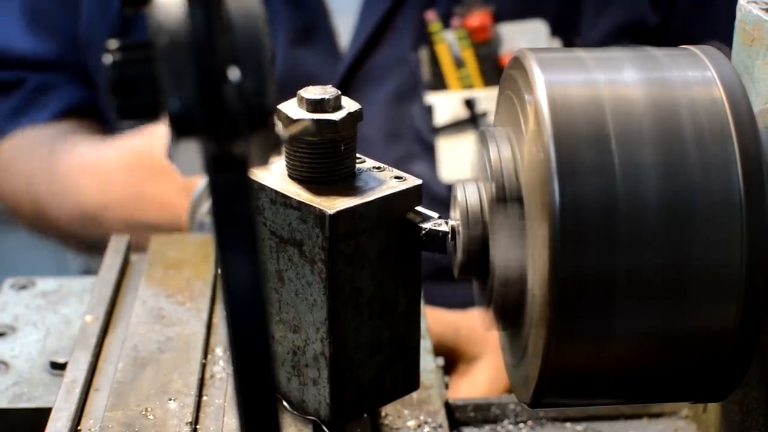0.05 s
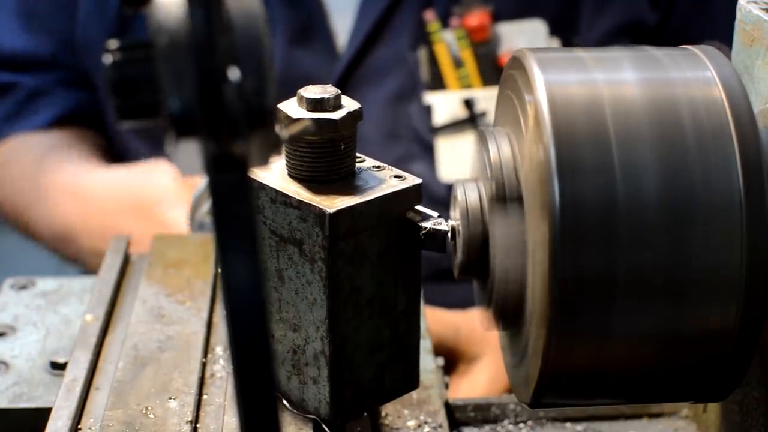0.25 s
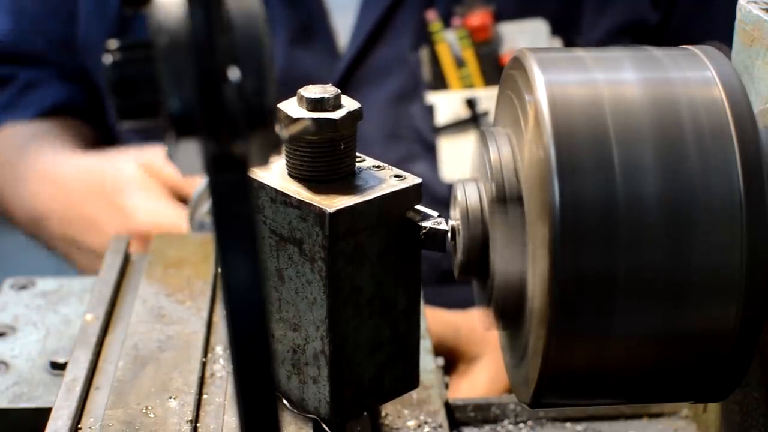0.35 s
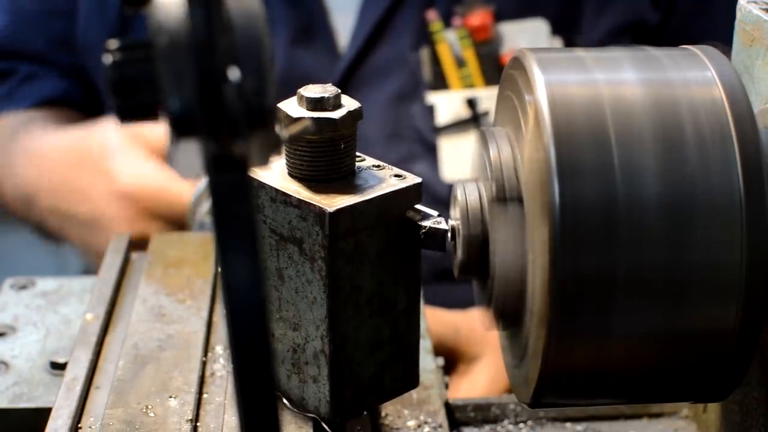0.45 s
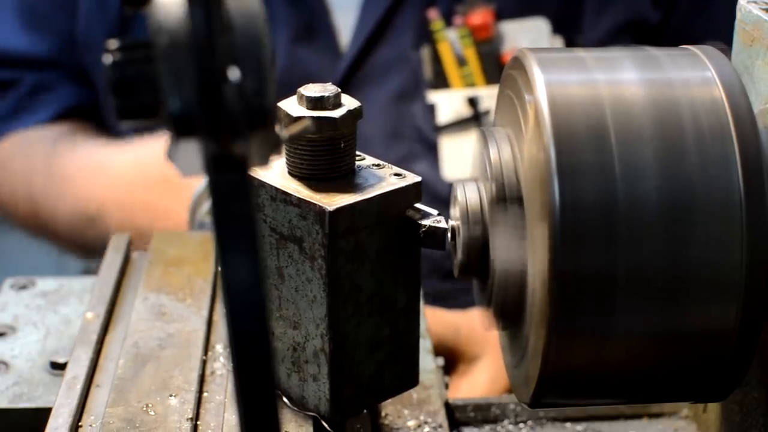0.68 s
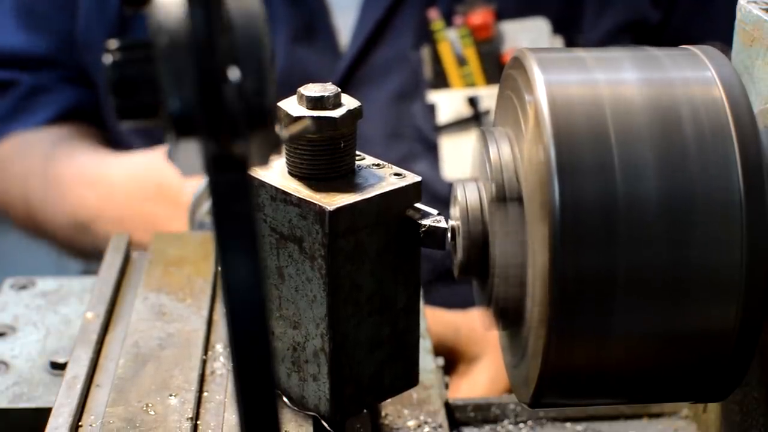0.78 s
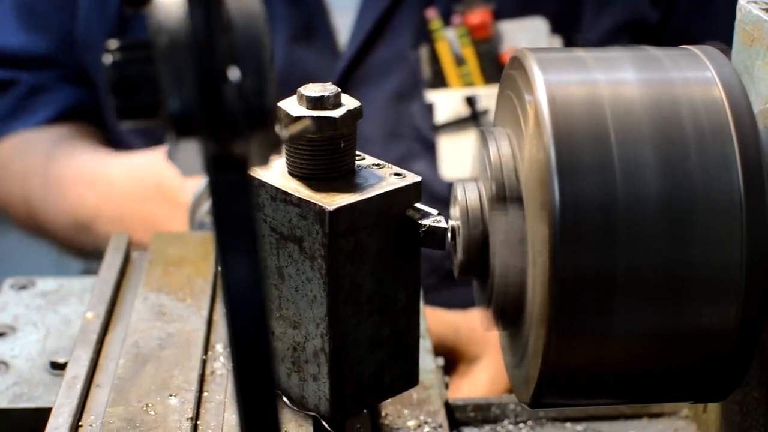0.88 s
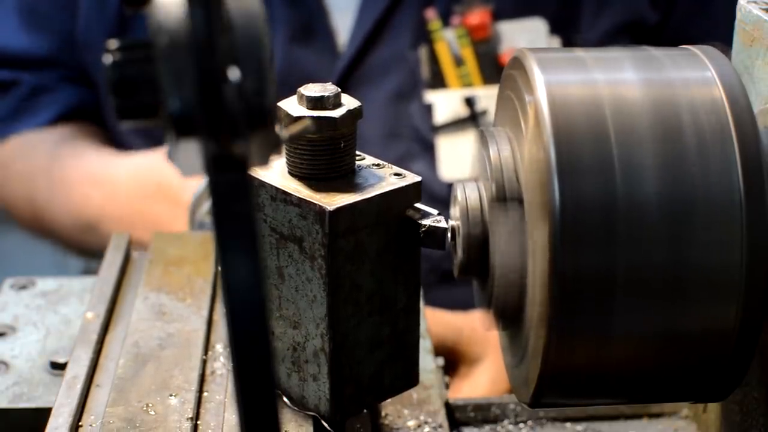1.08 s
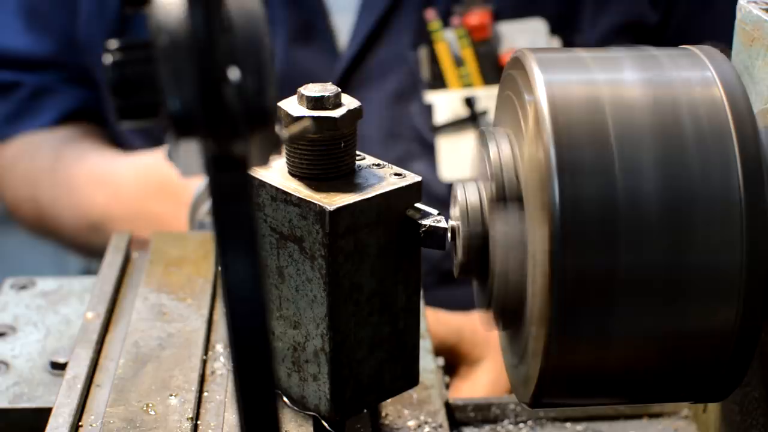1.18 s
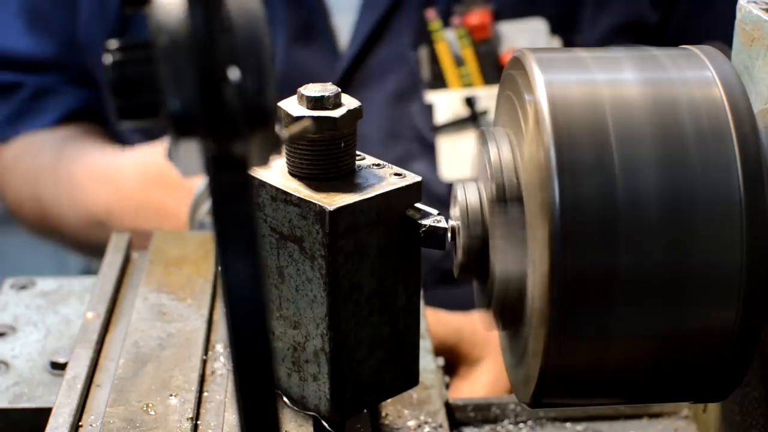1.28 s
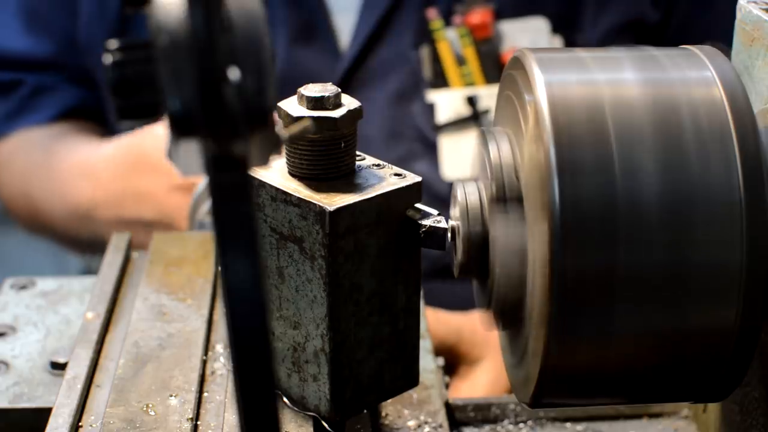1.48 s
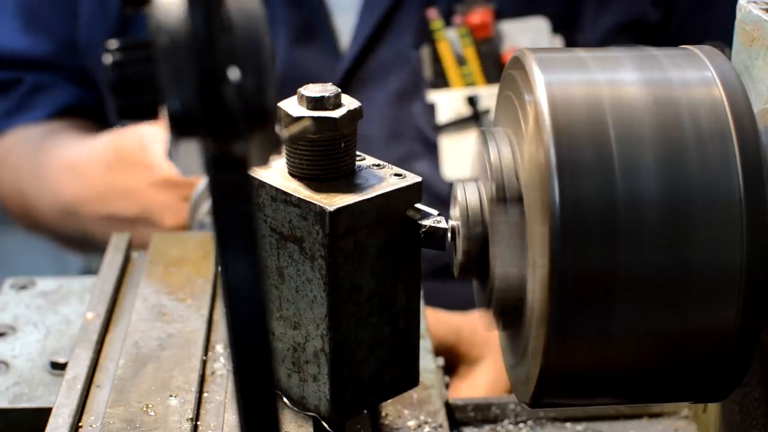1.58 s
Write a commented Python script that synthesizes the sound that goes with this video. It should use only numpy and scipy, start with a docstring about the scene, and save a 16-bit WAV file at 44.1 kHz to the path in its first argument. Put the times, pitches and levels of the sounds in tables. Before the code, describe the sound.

Close to the microphone, a lathe spins steadily, its gears whining and rattling over a hum. Early on, a brief cut into steel adds a scraping hiss and high, stuttering squeaks. A few faint ticks come before and after.

```python
"""A metal lathe runs close by: its motor hums, its gears whine and rattle in the same pattern on
every turn, and its bearings hiss. For half a second the tool bites into a small steel part.
The chip (the strip of metal being cut off) hisses and scrapes, the carriage that holds the tool
rumbles, and the tool shakes in short, high squeals. A few light touches tick before and after."""
import sys
import numpy as np
from scipy import signal
from scipy.fft import rfft, irfft, next_fast_len
from scipy.io import wavfile
from scipy.ndimage import map_coordinates

SR = 44100
rng = np.random.default_rng(int(sys.argv[2]) if len(sys.argv) > 2 else 0)


def master(y):
    """Save y as 16-bit WAV."""
    cut = np.clip(np.atleast_2d(y).T, -1, 1)
    pcm = np.round(cut * 32767)  # scale
    wavfile.write(sys.argv[1], SR, pcm.astype(np.int16))


N = 72765
SHAFT_HZ = 11.069  # turns a second


def amp(db):
    """Turn decibels into a gain."""
    return 10 ** (np.asarray(db) / 20)


def unit(x):
    """Scale a signal to an average (rms) level of 1."""
    return x / np.sqrt(np.mean(x ** 2) + 1e-20)


def clock():
    """The time of every sample, in seconds."""
    return np.arange(N) / SR


def wobble(rate):
    """A smooth curve through `rate` random values a second."""
    values = rng.standard_normal(int(N * rate / SR) + 4)
    return map_coordinates(values, [clock() * rate], mode="nearest")


def filtered(x, gain_at):
    """Scale each frequency in x by gain_at(hz)."""
    size = next_fast_len(N + 8192)
    return irfft(rfft(x, size) * gain_at(np.fft.rfftfreq(size, 1 / SR)), size)[:N]


def coloured(x, points):
    """Shape x with a curve of (pitch_hz, relative_db) points, then set its level to 1."""
    pitches, levels = np.transpose(points)

    def gain_at(hz):
        return amp(np.interp(np.log(hz + 1), np.log(pitches + 1), levels, left=-120, right=-120))
    return unit(filtered(x, gain_at))


def ringing(hz, width_hz):
    """Noise that rings around one pitch, at level 1."""
    return unit(filtered(rng.standard_normal(N), lambda f: 1 / (1 + ((f - hz) / width_hz) ** 2)))


def tone(hz):
    """A sine wave at level 1 with a steady or moving pitch."""
    return np.sqrt(2) * np.sin(2 * np.pi * (np.cumsum(hz * np.ones(N)) / SR + rng.random()))


def gate(start_s, end_s, rise_s, fall_s):
    """Fade in, hold and fade out."""
    return (1 + np.tanh((clock() - start_s) / rise_s)) * (1 - np.tanh((clock() - end_s) / fall_s)) / 4


def motor_hum():
    """Mains power makes the motor hum; the strongest tone swells and sinks."""
    # Loudness of the strongest tone: time_s, level_db
    swells = [(0.0, -42), (0.032, -42), (0.118, -47), (0.822, -49), (0.95, -41.5), (1.382, -42.5),
              (1.492, -47.5), (1.616, -46.5), (1.65, -49)]
    # Steady motor tones: pitch_hz, level_db
    steady_tones = [(120, -57.5), (203.6, -62)]
    drone = amp(np.interp(clock(), *np.transpose(swells))) * tone(240)
    return drone + sum(amp(db) * tone(hz) for hz, db in steady_tones)


def gear_whine():
    """Meeting teeth make close tones that beat together; higher rings swell once a turn."""
    # Tones of the meeting teeth: pitch_hz, level_db
    tooth_tones = [(597.4, -62.5), (608.5, -76.5), (613.6, -65), (619.5, -47.5), (641.7, -60), (652.6, -59),
                   (675.7, -59), (720.2, -53), (733.6, -47.5), (762.7, -66.5), (791.7, -66.5), (973.7, -68)]
    # Gear rings: place_turns, width_turns, cycles_per_turn, relative_db
    gear_rings = [(.47, .06, 180, 0), (.93, .04, 180, -2.5), (.59, .035, 186, -4), (.93, .06, 170, -3.5),
                  (.24, .04, 168, -4.5), (.54, .045, 170, -6), (.66, .08, 111, -7), (.2, .035, 109, -8)]
    flutter_db, rings_db = 1.17, -48
    speed = 1 + 0.00064 * wobble(11.5)  # all the tones drift together
    whine = sum(amp(db + flutter_db * wobble(29.5)) * tone(hz * speed) for hz, db in tooth_tones)
    for place, width, cycles, db in gear_rings:
        turns_away = (clock() * SHAFT_HZ - place + .5) % 1 - .5
        swell = np.exp(-.5 * (turns_away / width) ** 2)
        whine += amp(rings_db + db + wobble(5.9)) * swell * tone(cycles * SHAFT_HZ * speed)
    whistle = amp(-59.5) * ringing(2817, width_hz=9.9)
    return whine + whistle


def tooth_scrape(repeat_share=.75):
    """The same teeth scrape on every turn, so most of their noise repeats."""
    repeating = np.resize(rng.standard_normal(round(SR / SHAFT_HZ)), N)
    return np.sqrt(repeat_share) * repeating + np.sqrt(1 - repeat_share) * rng.standard_normal(N)


def gear_rattle():
    """The teeth scrape all the time and clack wherever the gears are tight."""
    # Tight spots in each turn: place_turns, decay_turns, level_db
    tight_spots = [(.06, 0.029, -44), (0.376, 0.099, -40), (0.602, 0.16, -50.5), (0.921, 0.094, -46)]
    # Tone colour of the scrape: pitch_hz, relative_db
    scrape_colour = [(700, -10), (800, -4.5), (880, -9.5), (1020, -3), (1230, -1), (1310, -7.5), (1500, -6),
                     (1750, -3.5), (1860, 0.5), (2150, -1.5), (2600, -2), (2830, -5.5), (3100, -4.5),
                     (3600, -11), (3920, -6), (4300, -17), (6000, -22.5)]
    # Tone colour of the clacks: pitch_hz, relative_db
    clack_colour = [(1200, -9), (1900, -13.5), (2300, 1.5), (2850, -5), (3300, -8.5), (3600, -16.5),
                    (3900, -6.5), (4400, -38.5), (6000, -22)]
    rise_turns = 0.0092
    clacks = np.zeros(N)
    for place, decay, db in tight_spots:
        turns_since = (clock() * SHAFT_HZ - place) % 1
        clacks += amp(db) * (1 - np.exp(-turns_since / rise_turns)) * np.exp(-turns_since / decay)
    scrape = amp(-47) * coloured(tooth_scrape(), scrape_colour)
    return scrape + clacks * coloured(tooth_scrape(), clack_colour)


def housing_and_bearings():
    """The metal housing around the shaft gives a low rush, and the bearings hiss."""
    # Tone colour of the housing: pitch_hz, relative_db
    housing_colour = [(15, -44), (25, -25.5), (70, -15), (100, -18), (165, -10), (260, -11), (350, -9.5),
                      (470, -4.5), (540, -11.5), (620, -7), (740, -17), (860, -16.5), (1000, -17.5),
                      (1300, -28)]
    # Tone colour of the bearings: pitch_hz, relative_db
    bearing_colour = [(2650, -22), (4500, -12), (4800, -7), (5280, -13.5), (5800, -7), (6330, -7),
                      (6530, -3.5), (6960, 0), (7450, 0.5), (10500, -21), (13300, -44.5)]
    rush = amp(-52) * coloured(rng.standard_normal(N), housing_colour)
    hiss = amp(-51 + 0.56 * wobble(40.2)) * coloured(rng.standard_normal(N), bearing_colour)
    return rush + hiss


def light_touches(touch_s=0.0023):
    """The tool and loose chips touch the metal lightly, making tiny high ticks."""
    # Touches: time_s, pitch_hz, width_hz, level_db
    touches = [(.088, 6550, 500, -45), (.11, 8150, 200, -46), (.143, 8500, 200, -44),
               (0.172, 8100, 250, -40), (.672, 8700, 250, -43), (.885, 9200, 700, -57),
               (1.39, 7400, 450, -44), (1.628, 10000, 700, -59)]
    return sum(amp(db) * np.exp(-.5 * ((clock() - time_s) / touch_s) ** 2) * ringing(hz, width)
               for time_s, hz, width, db in touches)


def chip_tearing(snaps_per_s=70, decay_s=0.00058, snap_db=12):
    """A loudness curve: the chip tears steadily and breaks in tiny snaps at random moments."""
    snaps = (rng.random(N) < snaps_per_s / SR) * rng.uniform(.3, 1, N)
    return 1 + amp(snap_db) * signal.lfilter([1], [1, -np.exp(-1 / (decay_s * SR))], snaps)


def cutting():
    """The chip tears off with a rough hiss and keeps the tool ringing."""
    # Times when the tool is in the steel: start_s, end_s, level_db
    cuts = [(0.146, 0.171, -41.5), (0.177, 0.268, -45), (0.274, 0.326, -37.5), (0.34, 0.645, -43),
            (0.665, 0.678, -41.5)]
    # Tone colour of the chip's hiss: pitch_hz, relative_db
    chip_colour = [(4000, -24), (6000, -20.5), (6800, -12), (7600, -3.5), (8200, -4.5), (8750, 3.5),
                   (9100, -5), (9550, -5), (9800, -11), (10600, -16.5), (12400, -26.5), (13300, -47)]
    # Rings of the tool: start_s, end_s, pitch_hz, width_hz, relative_db (against the hiss)
    tool_rings = [(0.525, 0.66, 8760, 74, -4.5), (.14, 0.83, 9520, 60, -6)]
    rise_s, fall_s, rough_db = 0.0035, 0.005, 1.5
    contact = sum(amp(db) * gate(start, end, rise_s, fall_s) for start, end, db in cuts)
    tearing = rng.standard_normal(N) * chip_tearing()
    roughness = amp(rough_db * wobble(500) + wobble(70.8))
    hiss = coloured(tearing * roughness, chip_colour)
    ring = sum(amp(db) * gate(start, end, rise_s, fall_s) * ringing(hz, width)
               for start, end, hz, width, db in tool_rings)
    return contact * (hiss + ring * amp(1.7 * wobble(119)))


def carriage_rumble(fade_s=0.051):
    """The force of the cut makes the carriage rumble and the post that grips the tool ring."""
    # Tone colour of the rumble: pitch_hz, relative_db
    rumble_colour = [(100, -12), (200, -2), (310, 0), (450, -1), (620, 0.5), (1000, -13)]
    # Rings of the tool post: start_s, end_s, pitch_hz, width_hz, level_db
    post_rings = [(0.34, 0.63, 2900, 47, -51.5), (.27, 0.59, 320, 43, -57.5)]
    load = gate(0.19, 0.666, fade_s, fade_s)
    rumble = amp(-51.5) * load * coloured(rng.standard_normal(N), rumble_colour)
    return rumble + sum(amp(db) * gate(start, end, fade_s, fade_s) * ringing(hz, width)
                        for start, end, hz, width, db in post_rings)


def tool_squeals():
    """The tool shakes (chatters) in bursts: nearly pure when strong, ragged when weak."""
    # Squeal pitch, lowest where the tool bites hardest: time_s, pitch_hz
    pitch_curve = [(.2, 9430), (.243, 9440), (.254, 9330), (.28, 9340), (.29, 9230), (.335, 9205),
                   (.356, 9325), (.4, 9355), (.47, 9310)]
    # Bursts of squealing: start_s, end_s, level_db, roughness (0 to 1)
    bursts = [(0.192, 0.203, -36.5, 0.5), (.232, 0.24, -33.5, 0.3), (0.2471, .252, -18, 0.2),
              (0.253, 0.258, -24, 0.3), (0.26, 0.28, -36.5, 0.34), (0.282, 0.2868, -15, 0.2),
              (.290, 0.297, -14, .1), (0.298, 0.31, -19.5, 0.2), (.315, .319, -14, 0.2),
              (.3215, 0.334, -14, 0.14), (0.341, 0.349, -28, 0.42), (0.35, .368, -25, 0.42),
              (0.372, 0.409, -34.5, 0.5), (0.414, .467, -39.5, 0.5)]
    jitter_hz, flutter_db = 27.8, 0.7
    pitch = np.interp(clock(), *np.transpose(pitch_curve))
    pure = tone(pitch + jitter_hz * wobble(302.4))
    ragged = ringing(pitch.mean(), width_hz=197)
    chip_scrape = amp(-17) * ringing(9080, width_hz=330)
    squeals = np.zeros(N)
    for start, end, db, roughness in bursts:
        voice = np.sqrt(1 - roughness ** 2) * pure + roughness * ragged + chip_scrape
        squeals += amp(db) * gate(start, end, rise_s=0.0015, fall_s=0.0027) * voice
    return squeals * amp(flutter_db * wobble(247.8))


def scene():
    """The running lathe and the cut, mixed into one channel."""
    lathe = motor_hum() + gear_whine() + gear_rattle() + housing_and_bearings()
    cut = cutting() + light_touches() + carriage_rumble() + tool_squeals()
    return (lathe + cut)[None]


def record(dry):
    """Remove the very highest treble."""
    top_hz = 13300
    return np.array([filtered(channel, lambda hz: hz < top_hz) for channel in dry])


dry = scene()
out = record(dry)
master(out)
```